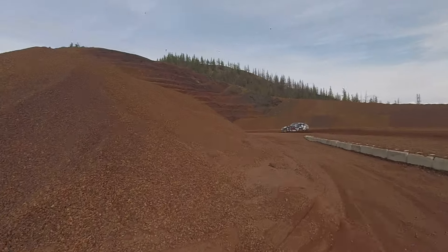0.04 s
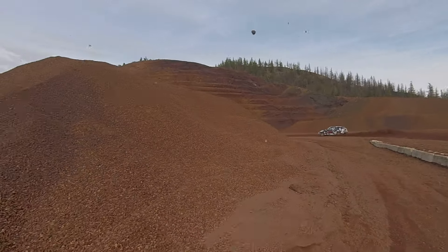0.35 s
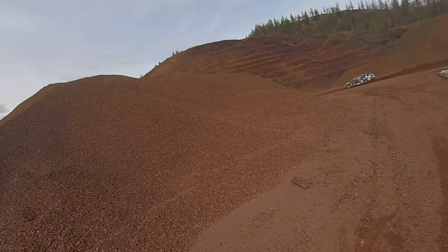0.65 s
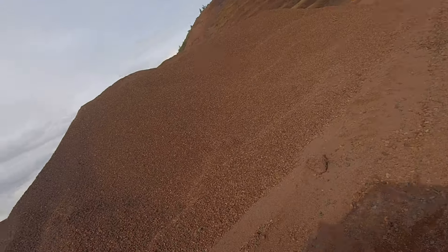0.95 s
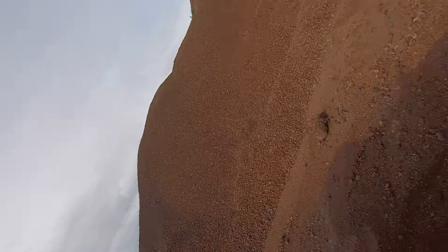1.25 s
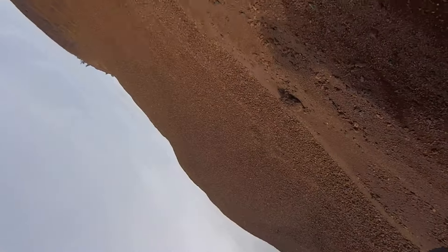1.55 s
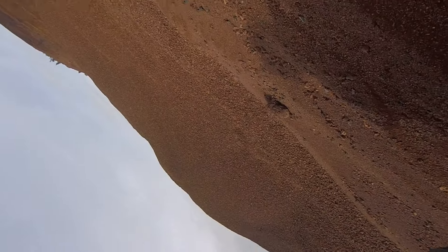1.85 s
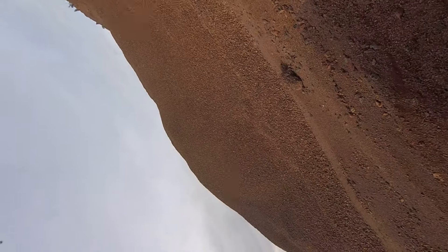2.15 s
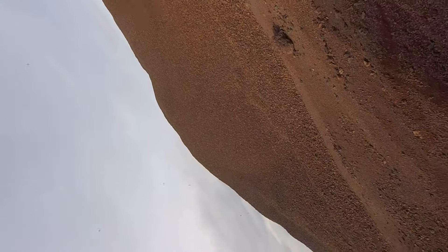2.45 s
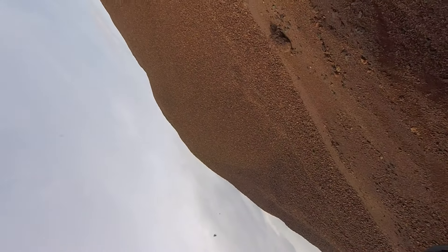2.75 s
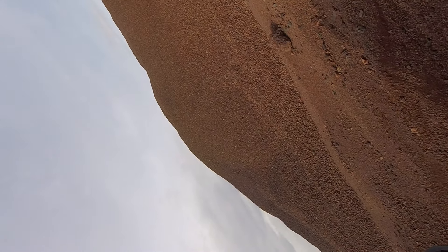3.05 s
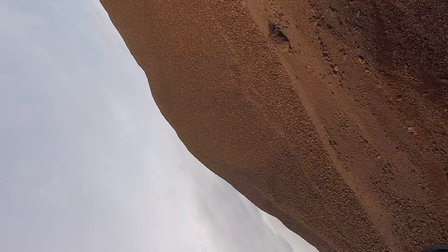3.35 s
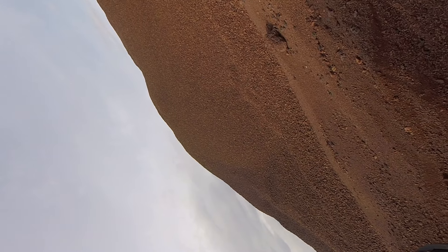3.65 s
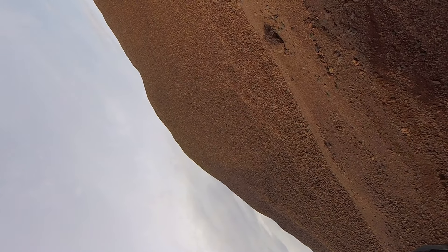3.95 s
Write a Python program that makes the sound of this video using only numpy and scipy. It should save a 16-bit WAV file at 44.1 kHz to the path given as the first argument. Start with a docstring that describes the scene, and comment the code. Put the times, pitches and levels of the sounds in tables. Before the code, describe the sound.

An off-road vehicle crunches onto its side in gravel and slides, its engine throbbing low.

```python
"""An engine throbs and tyres grind over gravel, heard from on board an off-road vehicle.
It runs up a bank and tips onto its side with a crunch, then slides, drops and scrapes to a halt while
stones tick against it. The frame rumbles throughout, and the engine sinks to an idle.
Exhaust and gears are wavering tones, stones are showers of tiny impacts, the frame and hull are
resonances shaken by noise, and struck panels ring in a few dying modes."""
import sys
import numpy as np
from scipy import signal
from scipy.fft import rfft, irfft, next_fast_len
from scipy.io import wavfile
from scipy.ndimage import uniform_filter1d

SR = 44100
rng = np.random.default_rng(int(sys.argv[2]) if len(sys.argv) > 2 else 0)


def waveform_to_disk(signal):
    """Save audio, clipped to [-1, 1], as 16-bit WAV at the path in sys.argv[1]."""
    frames = np.transpose(np.atleast_2d(signal))
    scaled = np.clip(frames, -1, 1) * 32767
    samples = np.round(scaled).astype(np.int16)
    wavfile.write(sys.argv[1], SR, samples)


N = 176400
T = np.arange(N) / SR


def from_db(db):
    """Decibels to gain."""
    return 10 ** (np.asarray(db) / 20)


def rms_one(x):
    """Scale to rms 1."""
    return x / np.sqrt(np.mean(x ** 2) + 1e-20)


def curves(rows, outside=None):
    """Each column after the first as a curve in time; the ends hold unless `outside` is given."""
    times, *columns = np.transpose(rows)
    return [np.interp(T, times, column, outside, outside) for column in columns]


def drift(rate_hz):
    """A slow random wobble with a spread of 1."""
    step, run_in = 40, 2000
    pole = np.exp(-2 * np.pi * rate_hz * step / SR)
    noise = rng.standard_normal(N // step + run_in + 2)
    slow = signal.lfilter([1], [1, -2 * pole, pole * pole], noise)[run_in:]
    return np.interp(np.arange(N) / step, np.arange(len(slow)), rms_one(slow))


def coloured(x, spectrum):
    """Causal EQ of unit power that follows a spectrum and falls 40 dB an octave beyond its ends."""
    size = next_fast_len(N + SR)
    size += size % 2
    octave = np.log2(np.maximum(np.arange(size // 2 + 1) * SR / size, 10))
    hz, db = np.transpose(spectrum)
    beyond = np.abs(octave - np.clip(octave, np.log2(hz[0]), np.log2(hz[-1])))
    gain = from_db(np.interp(octave, np.log2(hz), db) - np.minimum(40 * beyond, 90))
    cepstrum = irfft(np.log(rms_one(gain)))[:size // 2]
    cepstrum[1:] *= 2  # minimum phase: nothing rings ahead of a hit
    return irfft(rfft(x, size) * np.exp(rfft(cepstrum, size)))[:N]


def grains(per_s, spread_db):
    """Random stone contacts, many small and a few large; rms 1."""
    sizes = from_db(spread_db * np.minimum(rng.exponential(1, N), 4))
    signs = rng.choice([-1, 1], N)
    return rms_one(sizes * signs * (rng.random(N) < per_s / SR))


def steadied(x, span_s):
    """Even out the slow swings of a random force; rms about 1."""
    power = uniform_filter1d(x ** 2, max(int(span_s * SR), 2))
    return x / np.sqrt(np.abs(power) + 1e-9)


def burst(start, db, attack_s, t60):
    """Envelope with a straight rise and an exponential fall."""
    rise = np.clip((T - start) / attack_s, 0, 1)
    return rise * from_db(db - 60 * np.maximum(T - start - attack_s, 0) / t60)


def tone(rows, wander, rough_db):
    """A turning part: one sine that follows its pitch and level, unsteady in both."""
    hz = curves(rows)[0] * (1 + wander * drift(19))
    db = curves(rows, outside=-120)[1]
    phase = 2 * np.pi * np.cumsum(hz) / SR + rng.uniform(0, 2 * np.pi)
    return np.sqrt(2) * from_db(db + rough_db * drift(20)) * np.sin(phase)


def shaken(resonances):
    """Resonances shaken at random, each a narrow band of noise."""
    out = 0
    for hz, width, db in resonances:
        band = signal.butter(2, [hz - width / 2, hz + width / 2], "band", fs=SR, output="sos")
        ring = signal.sosfilt(band, rng.standard_normal(N + SR))[SR:]
        out += from_db(db) * rms_one(ring)
    return out


def struck(blows, modes, attack_s):
    """Every blow swells smoothly and rings all modes of one part, each with a strength of its own."""
    out = 0
    for start, db in blows:
        age = np.maximum(T - start, 0)
        contact = 1 - np.exp(-(2 * age / attack_s) ** 2)
        for hz, mode_db, t60 in modes:
            decay = from_db(db + mode_db + rng.normal(0, 1.6) - 60 * age / t60)
            out += contact * decay * np.sin(2 * np.pi * hz * age)
    return out


# The engine sags towards idle. Each row: time in seconds, fundamental in Hz.
ENGINE_PITCH = [(0, 61.5), (.16, 64.6), (.28, 53.6), (.38, 49), (.55, 53), (.8, 48.3), (1.03, 52.2),
                (1.11, 38.8), (1.22, 46), (1.45, 41.8), (1.72, 44), (2.08, 40.6), (2.55, 38.6),
                (3.35, 36.2), (3.8, 34.6), (4, 37.3)]
# The exhaust's throb. Each row: time in seconds, levels of harmonics 1 to 4 in dB.
EXHAUST_LEVELS = [(0, -33, -10, -29, -33), (.15, -27, -36, -20.5, -25), (.31, -24, -29, -20, -32.5),
                  (.4, -36, -32, -26.5, -44.5), (.55, -28, -29, -25.5, -39), (.93, -34, -35, -37, -36),
                  (1.03, -30, -36, -16, -31), (1.15, -23, -23.5, -24, -29.5), (1.3, -22, -37, -38, -18.5),
                  (1.55, -34, -26, -27, -25.5), (1.72, -19, -30, -24, -42), (1.92, -42, -33, -25, -36),
                  (1.98, -30.5, -38, -36, -18.5), (2.12, -33, -27, -35, -21), (2.3, -24, -20, -26, -43),
                  (2.68, -27.5, -25, -31.5, -16), (3.0, -25.5, -22.5, -21, -29),
                  (3.22, -26.5, -27.5, -32, -36.5), (3.35, -38, -37, -19, -40),
                  (3.48, -27.5, -27.5, -28, -35), (3.64, -24.5, -28, -23.5, -26), (3.7, -27, -31, -16, -29),
                  (3.81, -27, -27, -11, -43), (3.89, -25, -26, -25.5, -32.5),
                  (3.97, -25, -19, -15.5, -26.5)]
# Tone of the mechanical noise. Each row: frequency in Hz, gain in dB.
CLATTER_EQ = [(200, -2.5), (250, -8), (330, -8), (390, -7.5), (450, -4.5), (610, -4.5), (690, -10.5),
              (880, -11), (965, -9.5), (1030, -19), (1380, -19.5), (1650, -26), (1870, -25), (2080, -34.5),
              (2500, -30.5), (2950, -35.5), (3600, -45), (6000, -48.5), (8500, -57.5), (10500, -78)]
# Its fader. Each row: time in seconds, level in dB.
CLATTER_FADER = [(0, -29), (2, -32.5), (3.2, -33.5), (3.6, -32), (3.8, -30)]


def engine():
    """Exhaust harmonics on a slightly unsteady speed, over a steady mechanical rush."""
    hz = curves(ENGINE_PITCH)[0] * (1 + .0222 * drift(7.8))
    phase = 2 * np.pi * np.cumsum(hz) / SR
    upper_db = [-35.5 - 11.5 * np.log2(k / 5) for k in range(5, 13)]  # harmonics 5 to 12
    exhaust = 0
    for k, db in enumerate(curves(EXHAUST_LEVELS) + upper_db, 1):
        gain = np.sqrt(2) * from_db(db + 2.5 * drift(12))
        exhaust += gain * np.sin(k * phase + rng.uniform(0, 2 * np.pi))
    clatter = rng.standard_normal(N) * from_db(curves(CLATTER_FADER)[0])
    return exhaust + coloured(clatter, CLATTER_EQ)


# The low drone. Each row: time in seconds, pitch in Hz, level in dB.
DRONE_PATH = [(0, 100, -26), (.07, 90.9, -18.5), (.15, 101.6, -19.5), (.24, 96.7, -25.5), (.33, 86.2, -17),
              (.41, 97, -17.5), (.5, 90.2, -27), (.58, 98.95, -11.5), (.65, 88.2, -16), (.72, 96.6, -14),
              (.78, 82, -16.5), (.83, 96.5, -15), (1.0, 83.6, -26.5), (1.38, 92, -18), (2.15, 92.6, -33),
              (2.25, 83.7, -12), (2.35, 86.55, -33), (2.45, 88.16, -11.5), (2.55, 93.4, -21.5),
              (2.75, 92, -14.5), (2.87, 90, -24.5), (3.4, 94.97, -28.5)]


def driveline():
    """The driveline drones, its pitch wavering with the load on the wheels."""
    return tone(DRONE_PATH, wander=.023, rough_db=2.5)


# The frame's boom. Each row: resonance in Hz, width in Hz, gain in dB.
FRAME_MODES = [(61.3, 19, -7.5), (122.5, 31, 0.5), (154.6, 28, -2), (228.8, 46, -8.5)]
# How hard it is shaken. Each row: time in seconds, level in dB.
SHAKE_FADER = [(0, -14), (.15, -19), (.55, -21.5), (.8, -20), (1.05, -19.5), (1.42, -17), (1.9, -21),
               (2.18, -22), (2.28, -15), (2.5, -14.5), (2.8, -20), (3.25, -23.5), (3.6, -27)]


def frame():
    """Rough ground shakes the low resonances of the frame."""
    return steadied(shaken(FRAME_MODES), span_s=.036) * from_db(curves(SHAKE_FADER)[0])


# Swells of low buffeting. Each row: time in seconds, level in dB.
BUFFET_FADER = [(0, -17.5), (.25, -15.5), (.6, -20), (.85, -11.5), (1.05, -16.5), (1.38, -13), (1.5, -20.5),
                (2.1, -29.5), (2.28, -21), (2.8, -23), (3.3, -34), (3.6, -43)]
# Their sub-bass weight. Each row: frequency in Hz, gain in dB.
BUFFET_EQ = [(20, -20.5), (32, -23.5), (44, -6), (50, -7.5), (62, -13)]


def buffeting():
    """Wind and heaving of the whole vehicle under the frame's boom."""
    rumble = coloured(rng.standard_normal(N), BUFFET_EQ)
    return steadied(rumble, span_s=.037) * from_db(curves(BUFFET_FADER)[0])


def gravel(faders, grind_eq, hiss_eq):
    """Large stones grind through the body while fine grit hisses in clumps."""
    grind_db, hiss_db = curves(faders, outside=-120)
    grind = steadied(grains(per_s=3500, spread_db=2.5), span_s=.19) * from_db(grind_db)
    hiss = grains(per_s=12000, spread_db=4) * from_db(hiss_db + 1.6 * drift(17))
    return coloured(grind, grind_eq) + coloured(hiss, hiss_eq)


# The run up the bank. Each row: time in seconds, grind in dB, hiss in dB.
ROLL_FADERS = [(0, -20, -36.5), (.1, -21, -49.5), (.22, -21.5, -47.5), (.32, -31, -51), (.4, -37, -59),
               (.52, -23.5, -47.5), (.64, -29, -54.5), (.755, -26.5, -54.5), (.85, -18, -45.5),
               (1.0, -39.5, -55), (1.12, -28, -50), (1.2, -18, -49), (1.3, -19.5, -51.5),
               (1.37, -12, -42.5), (1.45, -48, -70)]
# Tone of its grind and of its hiss. Each row: frequency in Hz, gain in dB.
ROLL_GRIND_EQ = [(100, -24), (170, -6), (407, -15), (446, -18), (718, -20), (819, -20.5), (911, -22),
                 (1340, -34.5), (1520, -31.5), (4000, -56), (5200, -82), (8800, -120)]
ROLL_HISS_EQ = [(2000, -1), (3000, 0.5), (3800, -7.5), (5400, -5), (8100, -9.5), (10000, -19), (11500, -31),
                (15000, -36)]


def tyres():
    """Gravel rolls under the tyres until the vehicle tips."""
    return gravel(ROLL_FADERS, ROLL_GRIND_EQ, ROLL_HISS_EQ)


# Pebbles ping, then trickle away. Each row: time in seconds, level in dB.
PEBBLE_FADER = [(0, -53), (.4, -59), (.85, -54), (1.1, -61), (1.5, -51), (1.9, -69), (2.3, -60), (2.6, -58),
                (3.0, -66), (3.3, -72), (4, -80)]


def pebbles(count=24, per_s=400, t60=.016):
    """Sparse bounces, each ringing briefly at the pitch of one pebble."""
    pole = from_db(-60 / (t60 * SR))
    pings = 0
    for hz in np.geomspace(3380, 8430, count):
        angle = 2 * np.pi * hz * rng.uniform(.98, 1.02) / SR
        bounces = grains(per_s / count, spread_db=4) + 1e-18
        pings += signal.lfilter([np.sin(angle)], [1, -2 * pole * np.cos(angle), pole * pole], bounces)
    return rms_one(pings) * from_db(curves(PEBBLE_FADER)[0])


# The gliding whine. Each row: time in seconds, pitch in Hz, level in dB.
WHINE_PATH = [(.04, 700, -39), (.15, 700, -31), (.18, 545, -26), (.21, 457, -27.5), (.24, 507, -35),
              (.28, 565, -40), (.33, 517, -44), (.41, 440, -47), (.445, 435, -29), (.475, 605, -39),
              (.51, 653, -41), (.545, 713.6, -32), (.565, 656, -32), (.6, 622, -56), (.97, 770, -59),
              (1.01, 760.3, -41), (1.12, 748, -36), (1.17, 638, -37), (1.23, 510.5, -30),
              (1.3, 410.4, -27.5), (1.35, 383.4, -49)]


def gears():
    """The gears whine as the wheels slip and grip."""
    return tone(WHINE_PATH, wander=.012, rough_db=3.5)


# Dull body hits. Each row: start in seconds, level in dB.
THUD_CUES = [(.125, -19), (.796, -11.5), (1.402, -1.5), (1.449, -16), (2.49, -15)]
# The panel's ring. Each row: mode in Hz, gain in dB, 60 dB decay time in seconds.
PANEL_MODES = [(234.5, -5, 0.19), (284, -3.5, .14), (329, -3, .1), (430, -0.5, 0.048)]


def thuds():
    """A panel thuds when it meets the ground."""
    return struck(THUD_CUES, PANEL_MODES, attack_s=.0029)


# Crushed stones. Each row: start in seconds, level in dB, attack and 60 dB decay time in seconds,
# low-pass cutoff in Hz.
CRUNCH_CUES = [(.42, -37.5, 0.005, .17, 4970), (.759, -34, 0.0032, .1, 3000),
               (1.376, -23, .008, 0.089, 13120), (1.387, -19, 0.0065, 0.063, 13000),
               (1.436, -28, 0.00095, .06, 11000), (1.599, -25.5, 0.0077, 0.07, 13000),
               (1.632, -40, 0.0052, 0.067, 11000), (3.107, -37, 0.00073, .1, 6000)]
# Their crisp tone. Each row: frequency in Hz, gain in dB.
CRUNCH_EQ = [(900, -15.5), (1500, 2.5), (2100, -1.5), (3000, -14), (4800, -9), (8300, -10), (10000, -23),
             (11500, -29.5), (15000, -27)]


def crunches():
    """Stones crack under the body in dense clusters, some bright and some muffled."""
    cracks = steadied(grains(per_s=12000, spread_db=2), span_s=.003)
    clusters = 0
    for start, db, attack_s, t60, cutoff_hz in CRUNCH_CUES:
        lowpass = signal.butter(2, cutoff_hz, fs=SR, output="sos")
        clusters += signal.sosfilt(lowpass, cracks * burst(start, db, attack_s, t60) + 1e-18)
    return coloured(clusters, CRUNCH_EQ)


# Chassis jolts. Each row: start in seconds, level in dB, 60 dB decay time in seconds.
JOLT_CUES = [(0.421, -25, 0.43), (0.761, -18.5, 0.26), (0.79, -27.5, 0.13), (1.149, -25.5, 0.23),
             (1.378, -16.5, 0.26), (1.393, -18, 0.28), (1.438, -15, 0.39), (1.599, -19, 0.49),
             (2.088, -24, 0.41), (2.181, -24, 0.22), (2.472, -18, 0.18), (2.912, -22, 0.14),
             (3.028, -23, 0.17), (3.109, -23.5, 0.17)]
# Their boxy tone. Each row: frequency in Hz, gain in dB.
JOLT_EQ = [(120, -14), (230, -12), (340, 11), (450, 2.5), (560, 0.5), (900, -5.5), (1100, -11.5),
           (1450, -10), (2200, -31), (3500, -32), (6000, -45)]


def jolts():
    """Each jolt sets off a dying rattle of dull contacts in the chassis."""
    force = sum(burst(start, db, .003, t60) for start, db, t60 in JOLT_CUES)
    rattle = coloured(grains(per_s=3000, spread_db=5.5), JOLT_EQ)
    return force * steadied(rattle, span_s=.014)


# Metal on stone. Each row: start in seconds, level in dB, 60 dB decay time in seconds.
BITE_CUES = [(.421, -30, .16), (.759, -23.5, .13), (1.39, -15, .049), (2.179, -23.5, .55), (2.2, -25, .2),
             (2.475, -19, .2), (2.614, -20.5, .05), (3.109, -39, .14), (3.406, -31, .23)]
# Its hard midrange. Each row: frequency in Hz, gain in dB.
BITE_EQ = [(400, -6.5), (550, 3.5), (950, 3.5), (1150, -5.5), (1500, -12), (2000, -21.5), (2500, -23),
           (3500, -30.5)]


def bites():
    """The chassis bites into the stones with abrupt, rasping runs of hard contacts."""
    force = sum(burst(start, db, .003, t60) for start, db, t60 in BITE_CUES)
    rasp = coloured(grains(per_s=4000, spread_db=1), BITE_EQ)
    return force * steadied(rasp, span_s=.012)


# Loose stones on the body. Each row: start in seconds, level in dB, 60 dB decay time in seconds.
TICK_CUES = [(0.469, -40, 0.023), (0.48, -39, .018), (.592, -39.5, 0.058), (0.621, -44, .03),
             (.774, -47, .018), (0.826, -41, .02), (.908, -37, 0.037), (1.126, -41, 0.021),
             (1.743, -43, 0.044), (1.8845, -43, .038), (1.9712, -47, .03), (2.955, -50, .04),
             (3.042, -58, 0.022)]
# Their bright edge. Each row: frequency in Hz, gain in dB.
TICK_EQ = [(1500, -30), (3500, -8.5), (6000, 1), (8500, 0), (11000, -10.5), (14500, -20), (16000, -39)]


def ticks(snap_db=6):
    """Single stones strike sharply and chatter for a moment."""
    force = sum(burst(start, db, .00042, t60) for start, db, t60 in TICK_CUES)
    contacts = force * steadied(grains(per_s=9000, spread_db=3.5), span_s=.003)
    for start, db, _ in TICK_CUES:
        contacts[int(start * SR)] += from_db(db + snap_db)  # the first contact, above the chatter
    return coloured(contacts, TICK_EQ)


# The slide. Each row: time in seconds, grind in dB, hiss in dB.
SLIDE_FADERS = [(1.37, -43, -65), (1.41, -15, -35.5), (1.47, -19.5, -35.5), (1.55, -18.5, -43.5),
                (1.63, -16, -34.5), (1.69, -18.5, -43), (1.77, -25, -52), (1.87, -30, -59),
                (2.0, -68.5, -72)]
# Tone of its grind and of its hiss. Each row: frequency in Hz, gain in dB.
SLIDE_GRIND_EQ = [(100, -20), (170, -0.5), (249, -0.5), (502, -8.5), (573, -2), (637, -10), (947, -12),
                  (1390, -18.5), (2040, -36), (4000, -68), (5200, -76), (8800, -120)]
SLIDE_HISS_EQ = [(2000, 1), (3000, -1), (3800, -11), (5200, -5), (8200, -10), (10000, -14), (11500, -23.5),
                 (15000, -30)]


def slide():
    """The side of the body ploughs into the gravel bank."""
    return gravel(SLIDE_FADERS, SLIDE_GRIND_EQ, SLIDE_HISS_EQ)


# The rock hit. Each row: start in seconds, level in dB.
SLAM_CUES = [(1.3935, -8)]
# The side panel's clang. Each row: mode in Hz, gain in dB, 60 dB decay time in seconds.
SIDE_MODES = [(655, -12, .06), (858, -6.5, 0.1), (1080, -11, 0.061), (1340, -7, 0.043), (1506, -11, 0.028),
              (2030, -17, 0.019)]


def rock_slam():
    """A rock cracks against the side at the height of the crash."""
    return struck(SLAM_CUES, SIDE_MODES, attack_s=.00054)


# The last scrape. Each row: time in seconds, grind in dB, hiss in dB.
SCRAPE_FADERS = [(1.9, -48, -74), (2.0, -27.5, -59.5), (2.18, -33.5, -54), (2.22, -23, -49),
                 (2.29, -14, -50), (2.36, -20.5, -50.5), (2.425, -16, -46), (2.46, -17.5, -44.5),
                 (2.51, -14.5, -40.5), (2.65, -17.5, -48.5), (2.85, -23, -57), (3.02, -27.5, -61.5),
                 (3.2, -33, -64), (3.5, -74, -71)]
# Tone of its grind and of its hiss. Each row: frequency in Hz, gain in dB.
SCRAPE_GRIND_EQ = [(100, -45.5), (170, -5.5), (227, -3), (300, -7), (386, -7.5), (452, -11.5), (544, -11),
                   (681, -15), (864, -16.5), (1430, -27.5), (2010, -40), (4000, -53), (5200, -73),
                   (8800, -120)]
SCRAPE_HISS_EQ = [(2000, -9.5), (3000, 1.5), (4000, -16), (4800, -5), (5800, 3.5), (7000, -2), (8200, -4),
                  (10000, -12), (11500, -27), (15000, -37)]


def scrape():
    """The body settles and scrapes to a halt on the gravel."""
    return gravel(SCRAPE_FADERS, SCRAPE_GRIND_EQ, SCRAPE_HISS_EQ)


# The hull's ring. Each row: resonance in Hz, width in Hz, level in dB relative to the scrape's grind.
HULL_MODES = [(147.8, 24, -7), (223.6, 13.2, -6), (386.5, 18.9, -11), (547.9, 8.6, -13), (834.2, 53, -17),
              (1419.7, 54, -24.5)]


def hull():
    """The last scrape keeps the narrow resonances of the hull ringing."""
    grind_db = curves(SCRAPE_FADERS, outside=-120)[0]
    return from_db(grind_db) * shaken(HULL_MODES)


# The closing knocks. Each row: start in seconds, level in dB.
KNOCK_CUES = [(3.408, -24), (3.44, -28)]
# The loose part's ring. Each row: mode in Hz, gain in dB, 60 dB decay time in seconds.
LOOSE_PART_MODES = [(544.5, 5.5, .11), (624, 3, 0.054), (790, -7, 0.062), (934, -20, 0.089)]


def knocks():
    """A loose part knocks as the wreck settles."""
    return struck(KNOCK_CUES, LOOSE_PART_MODES, attack_s=.0029)


def scene():
    """Gravel, blows, machinery and body, mixed in mono as heard from on board."""
    ground = tyres() + slide() + scrape()
    stones = jolts() + bites() + crunches() + ticks() + pebbles()
    blows = thuds() + rock_slam() + knocks()
    machinery = engine() + driveline() + gears()
    body = frame() + hull() + buffeting()
    return (ground + stones + blows + machinery + body)[None]


def record(dry, ceiling=.98, cutoff_hz=15500):
    """The highest peaks are rounded and the top is cut."""
    rounded = dry / (1 + (dry / ceiling) ** 8) ** (1 / 8)
    lowpass = signal.ellip(10, .1, 80, cutoff_hz, fs=SR, output="sos")
    return signal.sosfilt(lowpass, rounded)


dry = scene()
out = record(dry)
waveform_to_disk(out)
```